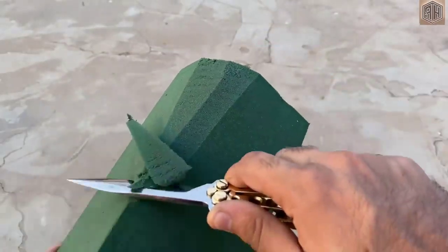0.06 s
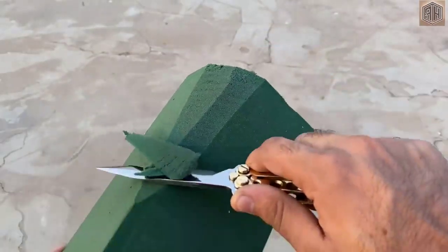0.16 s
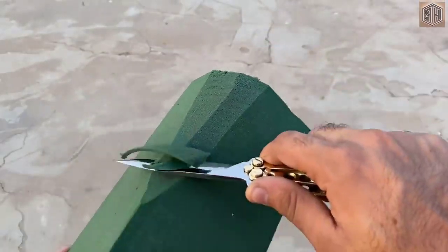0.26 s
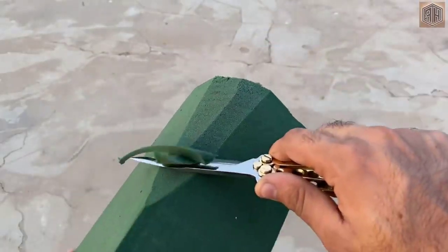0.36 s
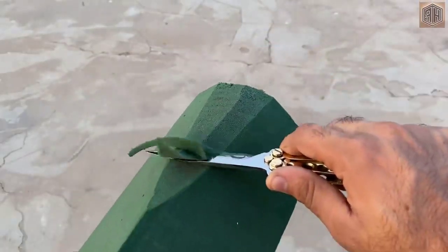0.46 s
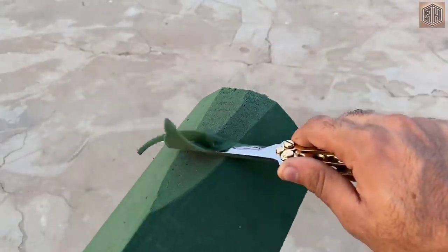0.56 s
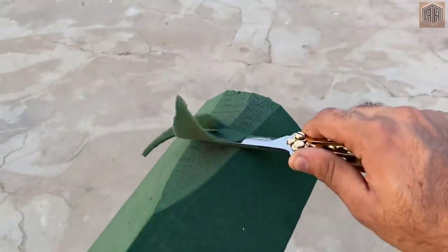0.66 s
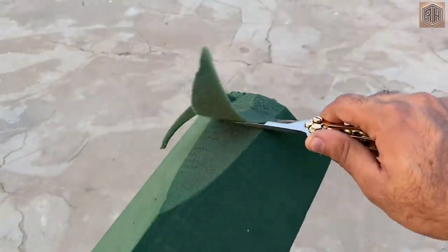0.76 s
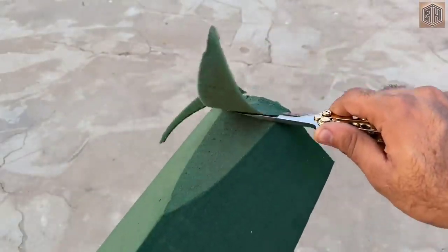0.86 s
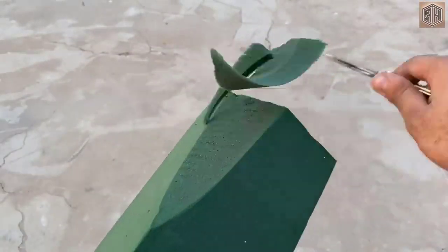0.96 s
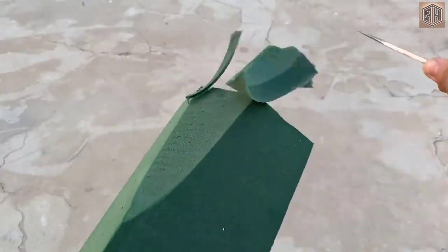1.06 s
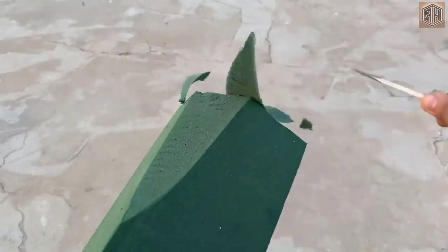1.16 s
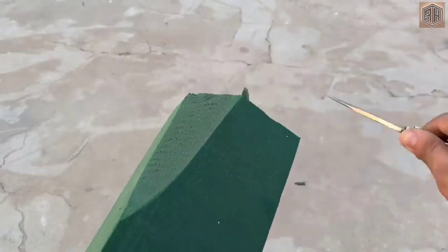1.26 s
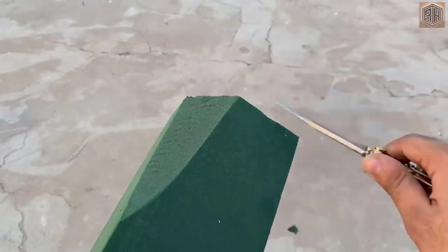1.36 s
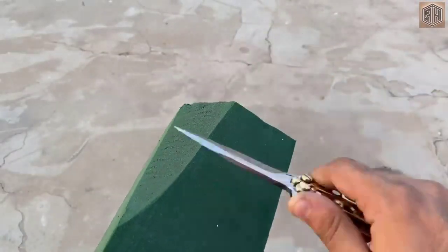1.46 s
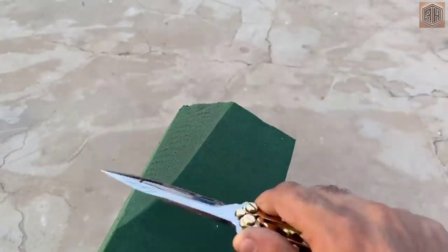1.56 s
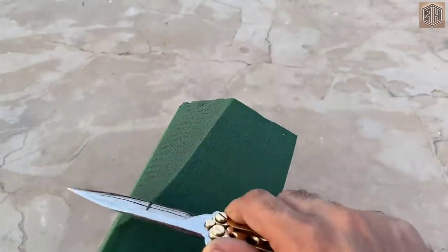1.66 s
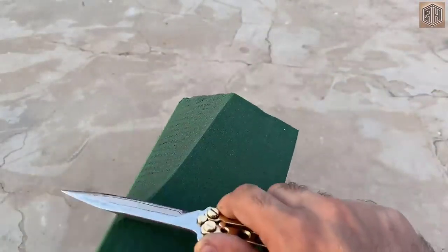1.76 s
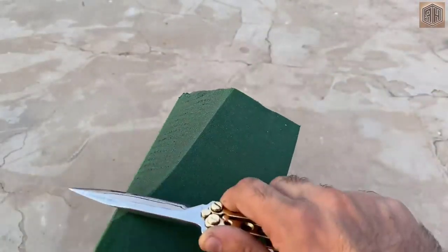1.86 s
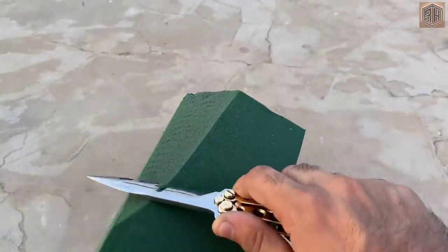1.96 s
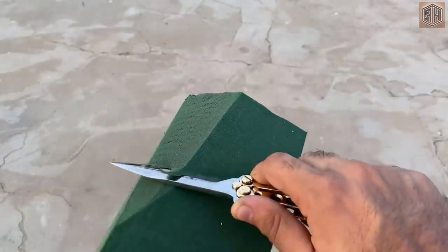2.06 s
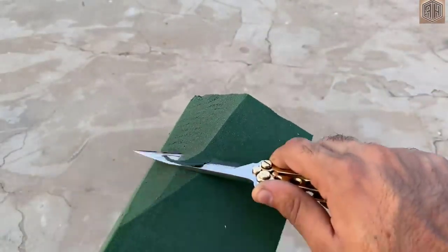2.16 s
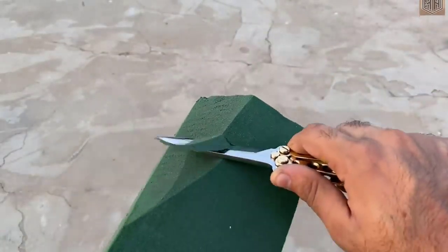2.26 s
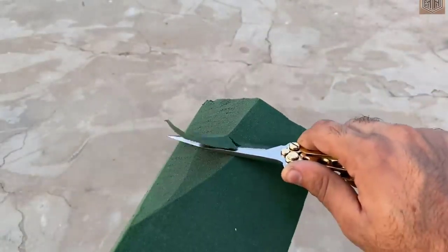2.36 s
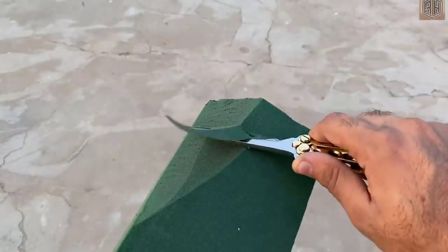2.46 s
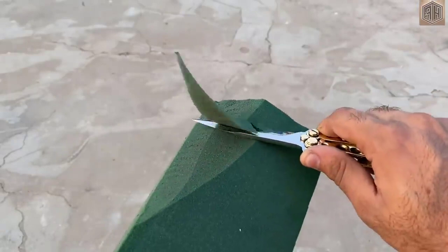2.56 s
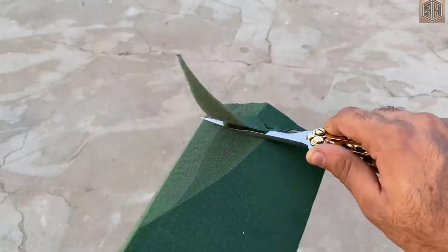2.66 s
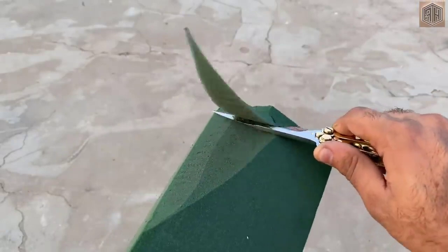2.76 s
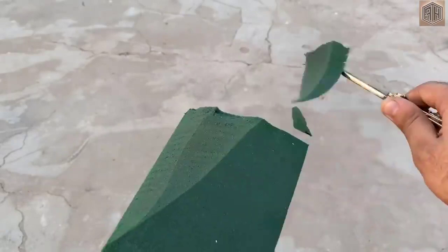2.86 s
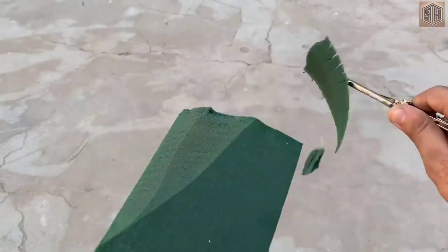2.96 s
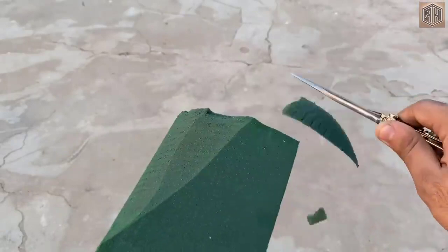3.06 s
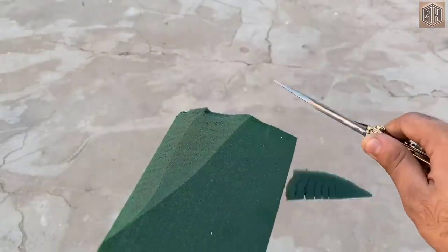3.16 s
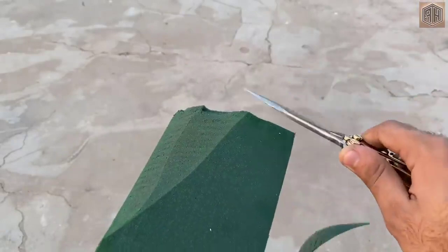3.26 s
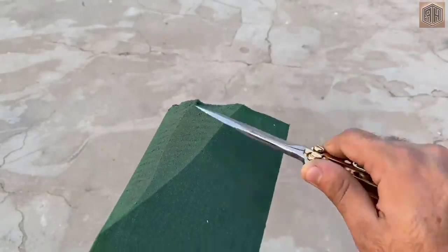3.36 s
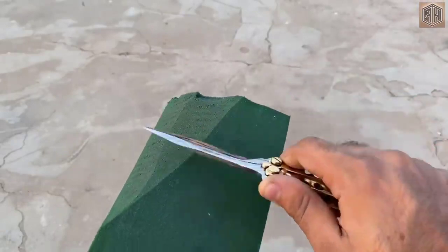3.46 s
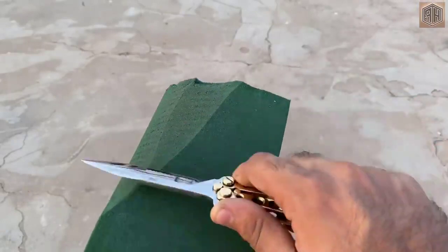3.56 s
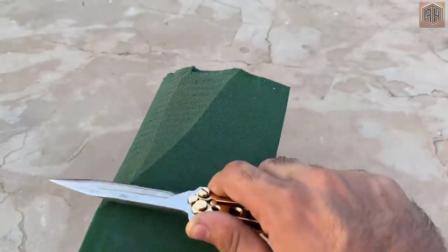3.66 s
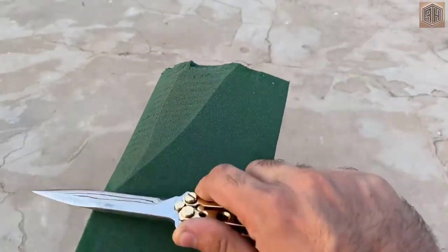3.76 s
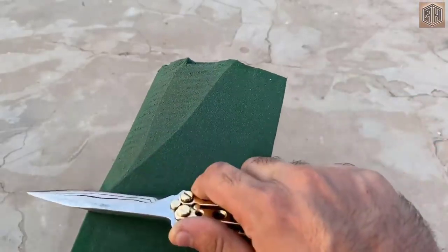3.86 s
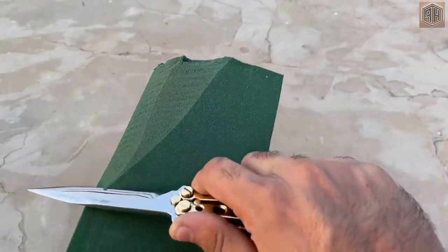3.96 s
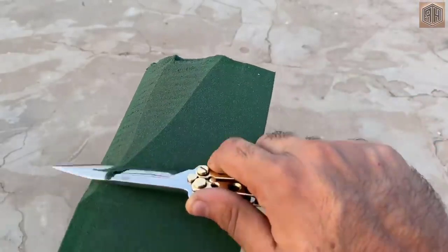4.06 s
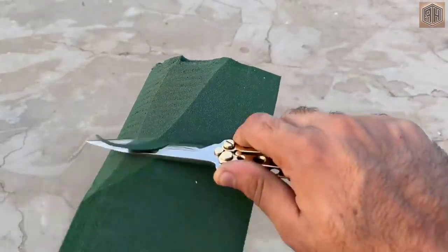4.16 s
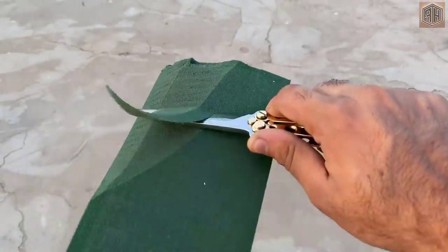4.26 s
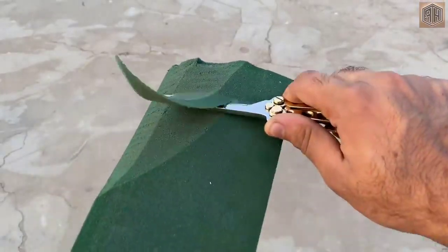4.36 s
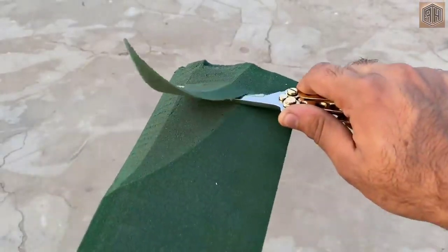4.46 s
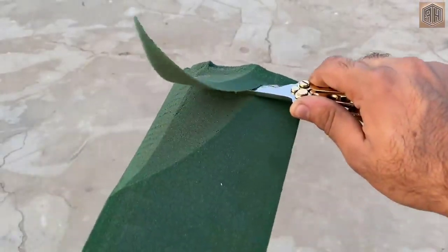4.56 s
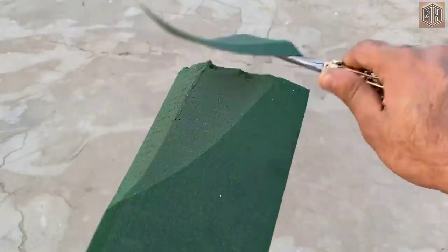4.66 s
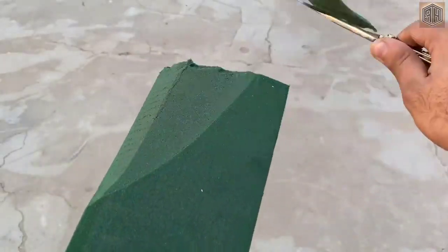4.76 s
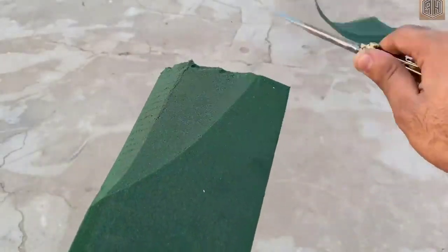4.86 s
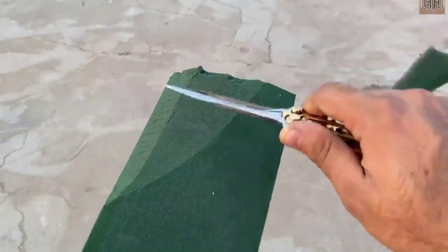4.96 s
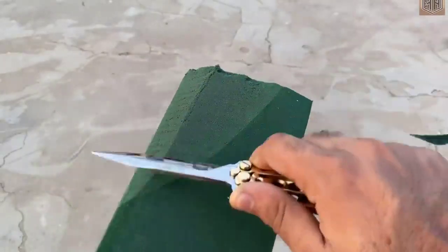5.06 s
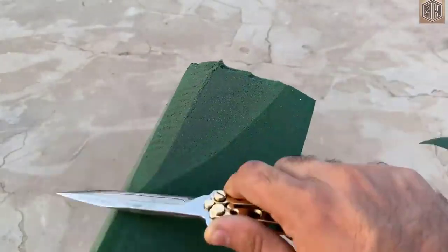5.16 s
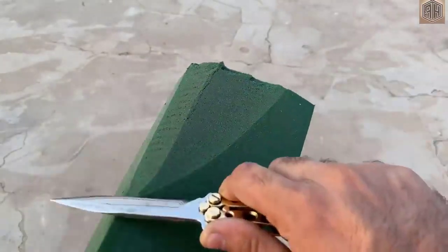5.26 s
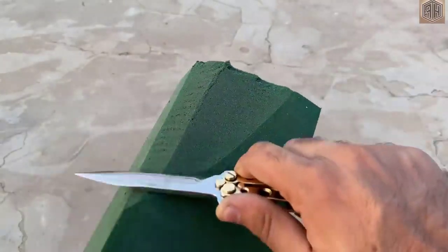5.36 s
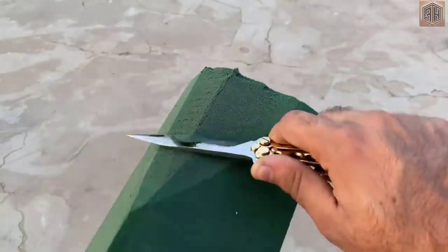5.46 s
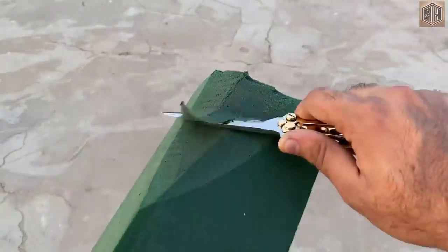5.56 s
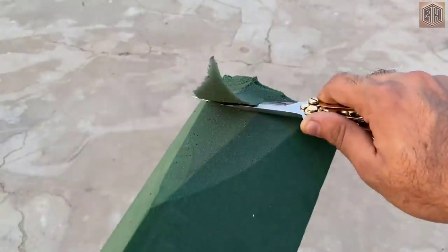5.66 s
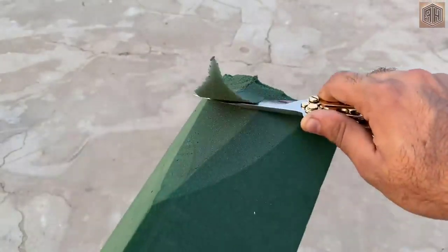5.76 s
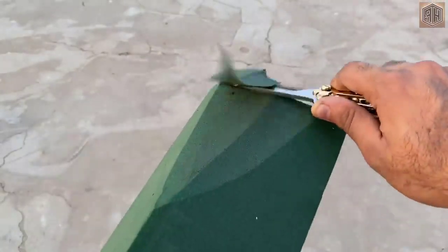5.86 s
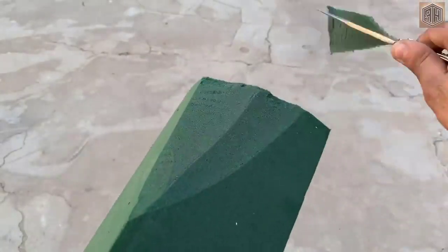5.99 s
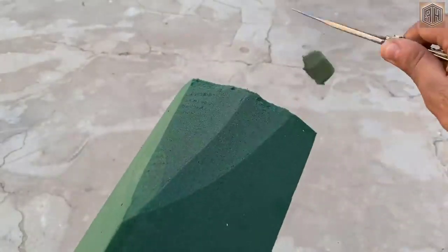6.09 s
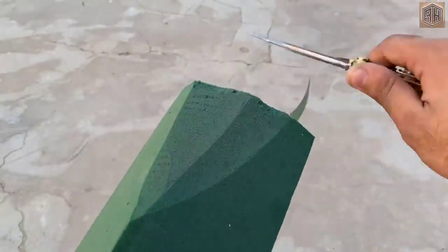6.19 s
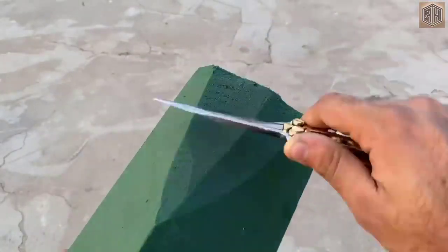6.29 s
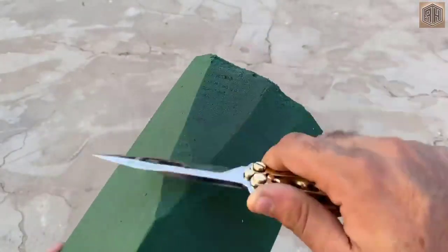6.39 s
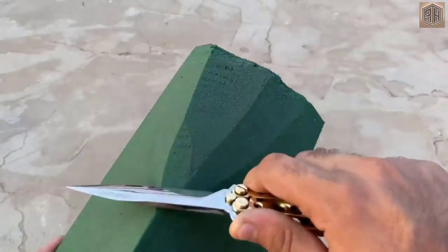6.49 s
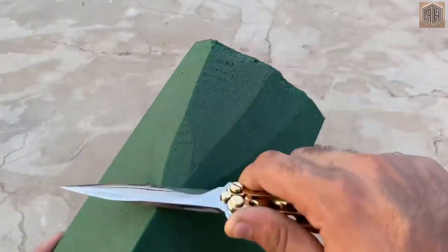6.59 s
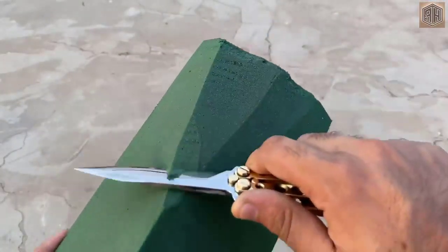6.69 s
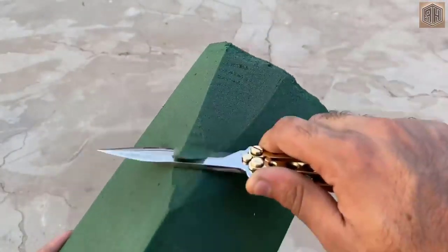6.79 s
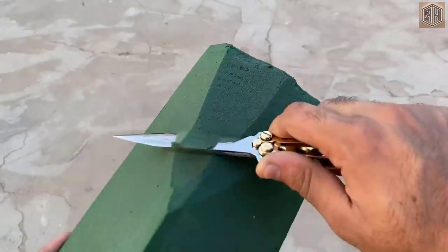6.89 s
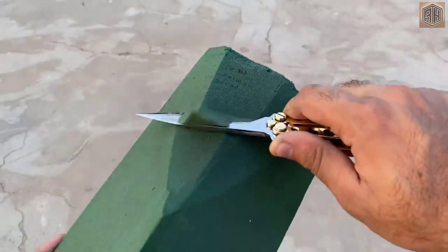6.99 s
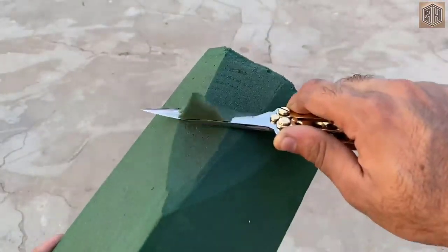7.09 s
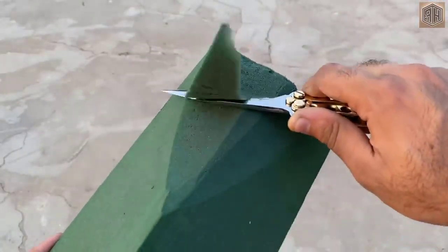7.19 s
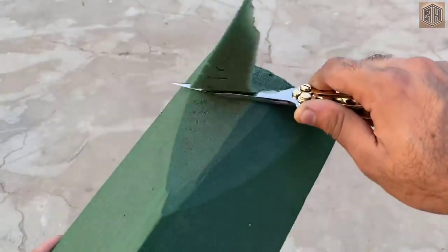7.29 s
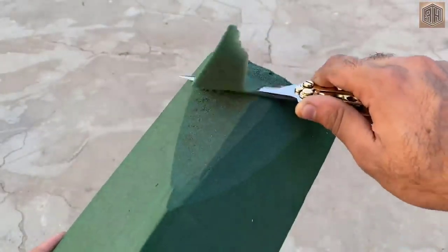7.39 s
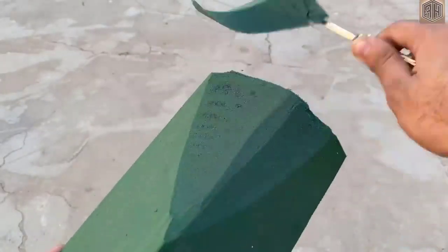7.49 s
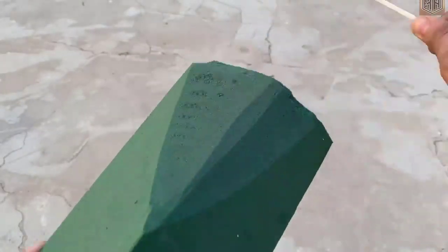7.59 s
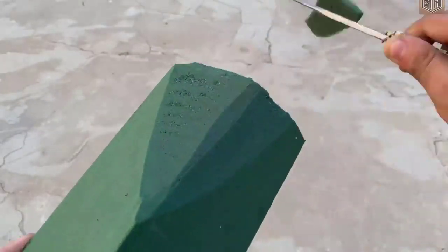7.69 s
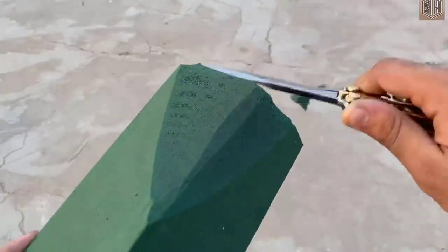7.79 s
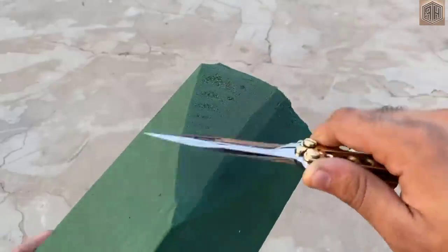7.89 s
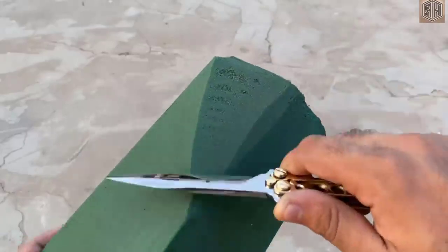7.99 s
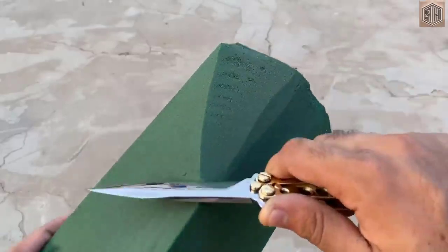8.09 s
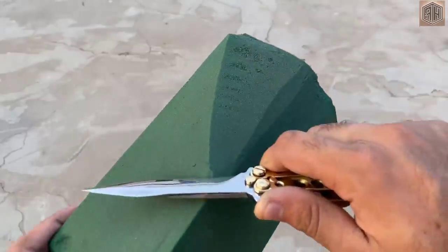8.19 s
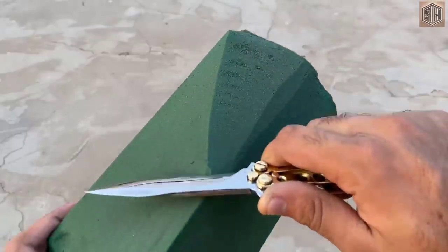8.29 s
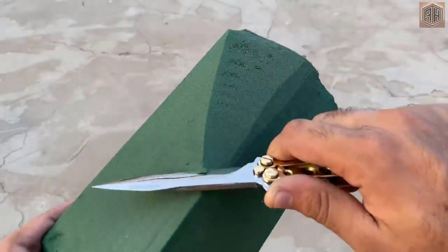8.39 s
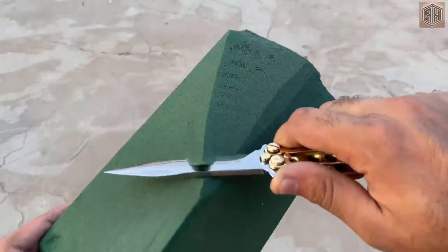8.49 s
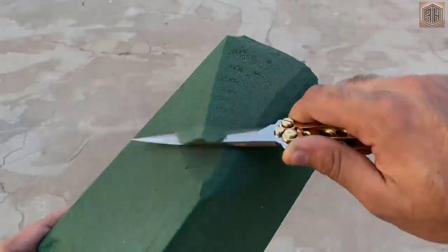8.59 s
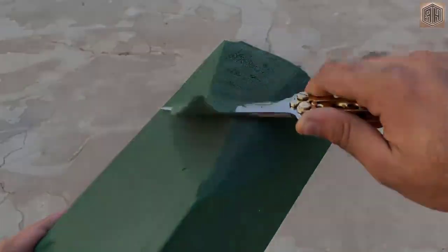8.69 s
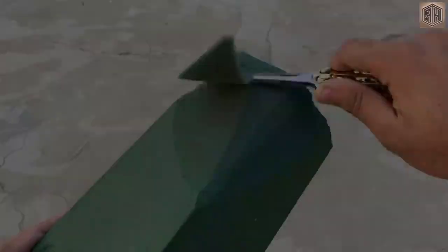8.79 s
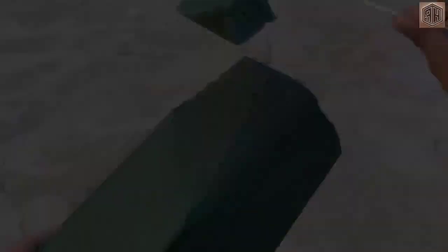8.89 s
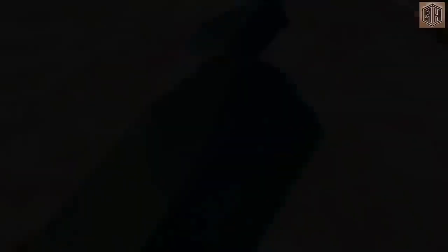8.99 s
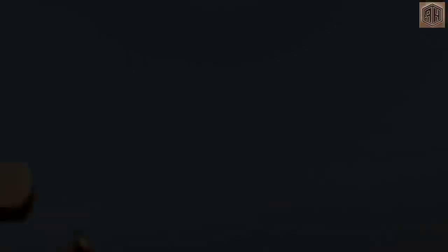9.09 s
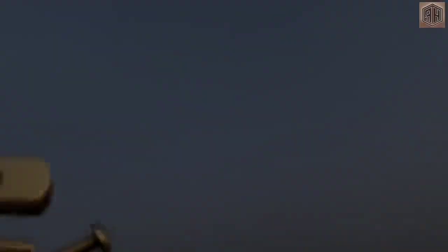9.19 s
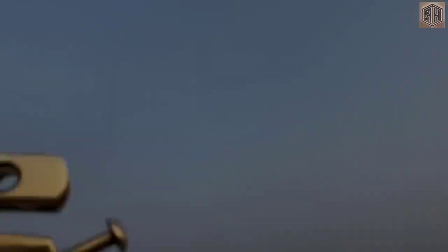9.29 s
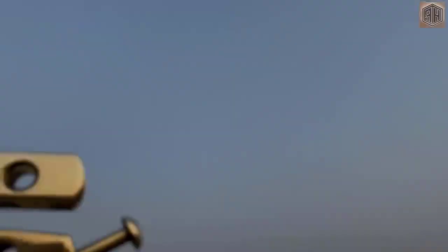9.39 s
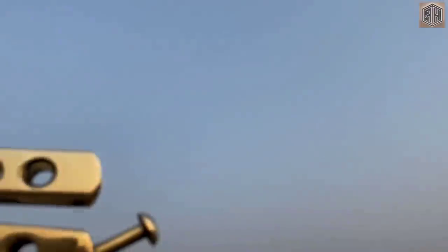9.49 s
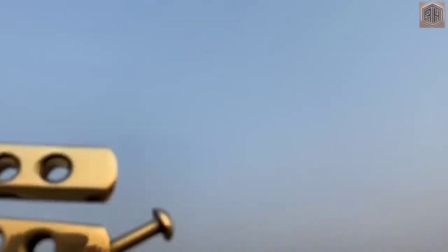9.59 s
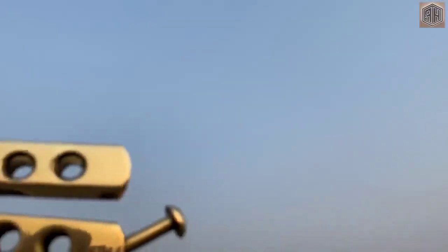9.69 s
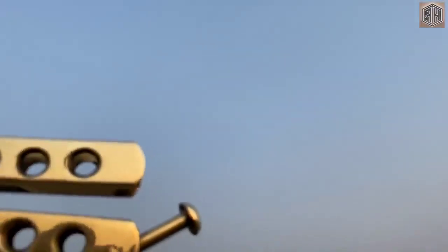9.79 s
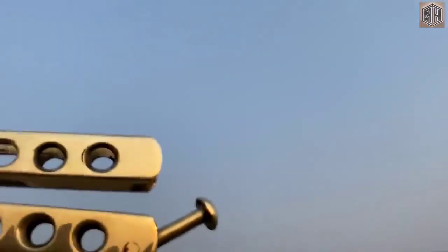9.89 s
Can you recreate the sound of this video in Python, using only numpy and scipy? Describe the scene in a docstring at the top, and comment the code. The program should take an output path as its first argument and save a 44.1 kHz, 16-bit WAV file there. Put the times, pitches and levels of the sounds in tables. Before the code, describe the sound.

Close stereo microphone, slightly stronger on the left, almost no reverberation. Six scratchy, crunchy knife strokes through crisp foam, each under or about a second, with gaps of roughly one second or less. The crackle swells, catches, surges and cuts off as the slice tears loose and the block gives a small dull jolt. Light ticks and grazes fill the gaps over faint outdoor rumble, ending in a muffled rustle and quiet air.

```python
"""A knife shaves six slices off a block of brittle floral foam, close by in a paved yard.
Each cut is filtered noise, a dense crackle of breaking cells: it starts dull and ringing, brightens,
sinks as the blade sticks and surges as it slips. Damped sine modes jolt the block as a slice comes free.
Around the cuts, grainy noise swells scuff the foam and short ringing bursts tick as crumbs snap off.
Behind lie a low noise rumble, thin hiss, faint far-off whines and a soft late rustle."""
import sys
import numpy as np
from scipy import signal
from scipy.fft import rfft, irfft, next_fast_len
from scipy.io import wavfile
from scipy.ndimage import uniform_filter1d

SR = 44100
rng = np.random.default_rng(int(sys.argv[2]) if len(sys.argv) > 2 else 0)


def wav_out(sig):
    """Save sig, one row per channel (or a flat mono array), as 16-bit PCM at SR to the path in sys.argv[1]."""
    wavfile.write(sys.argv[1], SR, np.round(np.clip(np.atleast_2d(sig).T, -1, 1) * 32767).astype(np.int16))


N = 438354
TIME, HZ = np.arange(N) / SR, np.fft.rfftfreq(512, 1 / SR)  # seconds; bins of the short-time spectra

# The slices. Each row: start in seconds, length in seconds, rise in seconds, bite in dB, growth over the
# cut in dB, block body at first in dB, block body at last in dB, fizz in dB, lean to the left on entry
# in dB, low ring of the fresh slice in Hz, high ring in Hz, ring as it tears free in Hz.
CUTS = [(-0.018, 1.049, 0.049, -41.5, 5.5, 0, 2.5, 0.5, 2.5, 3460, 6070, 1905),
        (1.937, 0.96, 0.059, -37.5, -3, -4, 3, 0, 5.5, 1550, 3660, 1800),
        (3.99, 0.76, 0.11, -32, -1, -3, 5.5, 3.5, 11.5, 1616, 3300, 1368),
        (5.397, 0.5965, 0.08, -28, -7, -0.5, 1.5, 4.5, 1.5, 1527, 5220, 1546),
        (6.708, .85, 0.05, -34, -4, 3, -1.5, 4, 0.5, 1110, 2450, 2850),
        (8.398, 0.53, 0.098, -38.5, 14, 2.5, -3.5, 3.5, 0, 2130, 3320, 1219)]
# The blade slips forward. Each row: centre in seconds, level in dB, half length in seconds.
SLIPS = [(0.406, -32.5, 0.0058), (0.555, -32, 0.014), (0.594, -28.5, 0.0048), (0.638, -31.5, 0.0092),
         (0.688, -33.5, 0.0092), (0.729, -33.5, 0.012), (0.792, -32, 0.0089), (0.864, -30, 0.0044),
         (0.89, -32, 0.0068), (0.971, -30, 0.0053), (1.012, -27.5, 0.0063), (2.345, -36.5, 0.043),
         (2.398, -29.5, 0.0046), (2.572, -36, 0.011), (2.626, -29.5, 0.0074), (2.717, -36.5, 0.017),
         (2.841, -28, 0.0096), (2.878, -26, 0.0073), (4.332, -32, 0.0048), (4.739, -25, 0.0062),
         (5.957, -29, 0.0093), (5.982, -24.5, 0.006), (7.026, -29, 0.0072), (7.07, -31, 0.0066),
         (7.127, -30, 0.0047), (7.243, -29, 0.011), (7.285, -26, 0.0094), (7.377, -26.5, 0.0087),
         (7.53, -22, 0.011), (7.556, -26, 0.0069), (8.901, -27.5, 0.0077), (8.924, -25, 0.0053)]
# The blade sticks in the foam. Each row: centre in seconds, drop in dB, half length in seconds.
STALLS = [(0.453, 8.5, 0.028), (.76, 5.5, 0.024), (2.454, 8.5, 0.054), (2.67, 4.5, 0.036),
          (2.777, 11, 0.039), (4.586, 3.5, 0.076), (5.865, 30.5, 0.058), (7.194, 9.5, 0.043),
          (7.457, 17.5, 0.032)]
# What every fresh slice rings with. Each row: pitch in Hz, relative lift in dB.
SLICE_RINGS = [(1160, 8.5), (1580, 2.5), (2080, 2), (3480, 5), (4850, 4.5), (5400, 8)]
# Colour of the breaking cells. Each row: frequency in Hz, relative level in dB per Hz.
CRUNCH_COLOUR = [(300, -8.5), (600, -7), (850, -7), (1050, -9.5), (1400, -2.35), (2200, 1.5), (2700, -1.86),
                 (3400, 0.07), (4600, -2.5), (7500, -4.5), (9000, -2), (10800, -6), (12500, -8.5),
                 (15000, -9.5)]
# Bass trim on that colour. Each row: frequency in Hz, gain in dB.
CRUNCH_BASS = [(20, -32), (90, -15), (180, -3.5), (300, 4)]
# Reach of the body control. Each row: frequency in Hz, share of the control from 0 to 1.
BODY_SHARE = [(900, 0.76), (1300, 0.013)]
# Reach of the fizz control. Each row: frequency in Hz, share of the control from 0 to 1.
FIZZ_SHARE = [(3000, 0.089), (5000, 0.51), (8000, 0.96), (15000, 0.32)]
# How alike the two microphone ports hear. Each row: frequency in Hz, left-right coherence from 0 to 1.
PORT_LIKENESS = [(100, 0.92), (800, 0.93), (1400, .72), (2100, 0.58), (3200, 0.57), (5500, 0.75),
                 (7200, .85), (15000, 0.91)]
# Phase between the ports. Each row: frequency in Hz, lead of the left in radians.
PORT_PHASE = [(200, -0.021), (1400, 0.87), (1800, -1), (2500, -0.64), (3100, 1.3), (3900, 0.83),
              (5500, -0.88), (7000, -0.17)]
# Balance of the ports. Each row: frequency in Hz, left minus right in dB.
PORT_BALANCE = [(150, 1), (600, 2.5), (1600, 3), (4500, 3.5), (7000, 1.5), (9000, 0)]
# Colour of the outdoor rumble and hiss. Each row: frequency in Hz, relative level in dB per Hz.
OUTDOOR_COLOUR = [(15, -48), (25, -26.5), (49, -8), (88, -1), (139, 1.5), (196, -5.5), (335, -13.5),
                  (515, -27), (790, -34.5), (856, -33), (1310, -47), (1630, -46), (2560, -52), (2930, -50),
                  (15000, -74)]
# Level of the outdoor rumble. Each row: time in seconds, level in dB.
RUMBLE_LEVEL = [(0, -53), (1.2, -52), (1.8, -58), (2.75, -45), (2.97, -57.5), (3.3, -50), (3.85, -53),
                (4.5, -48.5), (5.15, -51), (5.8, -48), (6.4, -50), (6.7, -57), (7.6, -53.5), (8.25, -58),
                (8.9, -51), (9.05, -66.5), (9.94, -66.5)]
# The hiss of the open air. Each row: time in seconds, level in dB, treble lift in dB.
AIR = [(0, -68, 0), (1.75, -71.5, 1.5), (5.1, -66, -4.5), (6.15, -66.5, -3), (6.501, -61.5, -5.5),
       (7.75, -72.5, 8), (7.95, -62.5, 10), (8.3, -69, 5.5), (9.301, -72.5, 7.5), (9.94, -75.5, 8.5)]
# Single echoes off the hand and the paving. Each row: delay in seconds, gain.
PAVING = [(.0031, .12), (.0064, .13), (.0089, .08)]
# Decay of the yard's reflections. Each row: frequency in Hz, time to fall 60 dB in seconds.
YARD_DECAY = [(200, 0.067), (2000, 0.11), (6000, 0.048), (14000, 0.15)]
# The block jolts as the blade leaves it. Each row: start in seconds, level in dB.
JOLTS = [(1.021, -41), (2.889, -28), (4.751, -33), (5.995, -29.5), (7.559, -30), (8.937, -49.5)]
# What the block rings with. Each row: pitch in Hz, relative level in dB, time to fall 60 dB in seconds.
BLOCK_MODES = [(67.4, -7.5, 0.26), (125, -3, 0.054), (179, -2, .08), (242, 0, 0.039), (344, -8.5, 0.032)]
# Crumbs snap off and tick. Each row: start in seconds, relative level in dB, centre in Hz, decay in seconds.
TICKS = [(1.132, -51.5, 6280, 0.0032), (1.256, -73, 4500, 0.0043), (1.311, -69, 8000, 0.0081),
         (1.345, -72, 6800, .01), (1.971, -55, 5000, 0.0044), (2.467, -27, 6280, 0.0034),
         (3.351, -66, 7140, 0.0033), (3.77, -51, 5570, .005), (3.812, -52, 5060, .005),
         (5.22, -71, 6250, .005), (5.292, -52.5, 4650, 0.0027), (5.415, -57, 4900, 0.0028),
         (6.132, -66, 1886, 0.0038), (6.606, -53, 5500, 0.0034), (7.42, -39.5, 5000, .004),
         (7.448, -48.5, 7000, 0.0033), (7.476, -35, 6100, .004), (8.155, -43.5, 5820, 0.0036),
         (8.217, -50.5, 1080, 0.0043), (8.295, -59, 4540, 0.0097), (9.721, -60, 598, 0.013)]
# Faint far-off whines and chirps. Each row: centre in seconds, level in dB, half length in seconds,
# pitch in Hz, width in Hz.
FAR_TONES = [(3.068, -80.5, 0.025, 2940, 39.7), (3.385, -79, 0.02, 4230, 150), (3.42, -81, 0.053, 1650, 80),
             (6.313, -70, 0.043, 797, 90), (6.53, -84, 0.024, 2900, 29.3), (6.726, -65, 0.034, 1037, 60),
             (9.095, -62, 0.025, 947, 150)]
# The blade brushes the foam as it is set down. Each row: centre in seconds, relative level in dB,
# half length in seconds, ring in Hz, how fully the face rings from 0 to 1.
SCUFFS = [(3.779, -49, 0.0094, 1690, 1), (3.827, -50, 0.014, 1700, 1), (3.864, -52, .018, 1670, 0.93),
          (6.609, -58, 0.012, 2400, .4), (7.905, -62, 0.0094, 1690, .4), (7.984, -61.5, 0.027, 2130, 0.4),
          (8.009, -38, 0.0072, 2800, 0.1), (8.029, -52, 0.019, 2130, 0.4), (8.17, -61.5, 0.043, 2220, 0.6),
          (8.304, -60, 0.012, 3170, 0.96), (8.41, -66, .031, 2130, .5)]
# Colour of the scuffs. Each row: frequency in Hz, relative level in dB per Hz.
SCUFF_COLOUR = [(100, -9), (1100, -18), (1600, -3), (2400, 1), (3600, -3.5), (5000, -5), (6300, -5.5),
                (8400, -7.5), (10500, -9), (15500, -18)]
# What the face of the block rings with under a scuff. Each row: pitch in Hz, lift in dB.
FACE_RINGS = [(3350, 3), (4400, 13), (4700, 10), (5050, 15), (5450, 14)]
# Everything drops out briefly. The pair: start in seconds, end in seconds.
HUSH = (9.125, 9.187)
# A soft dull rustle. Each row: centre in seconds, level in dB, half length in seconds.
RUSTLES = [(9.338, -58, .03), (9.402, -62.5, .035)]
# Colour of the rustle. Each row: frequency in Hz, relative level in dB per Hz.
RUSTLE_COLOUR = [(150, -22.5), (350, 3), (700, 3), (1300, -10), (2200, -7.5), (2600, -10), (3200, -6),
                 (4000, -32), (8000, -57)]

# The edge sinks in from this far down, and leaves the foam abruptly.
ENTRY_DB, ENTRY_CURVE, RELEASE_DB_PER_S = 42.5, 1.51, 854
TOUCH_S = 0.012  # the edge first meets the foam this gently
FRESH_S, TEAR_S = 0.27, 0.2  # how long a slice stays short and stiff; how long it takes to tear free
# Duller on entry and on tearing, hissier while the blade sticks.
FRESH_FIZZ_DB, STALL_FIZZ_DB, TEAR_FIZZ_DB = -9.5, 3, -1.5
LEAVE_FIZZ_DB, LEAVE_S = -8.5, 0.02  # the fizz stops first as the edge comes out
# The lighter the bite, the more of the block's body is heard.
USUAL_BITE_DB, BITE_RANGE_DB, LIGHT_BODY_DB = -34.5, 7.5, 4.5
JUDDER_PER_S, JUDDER_DB, JUDDER_DRIFT = 31, 0.5, 0.16  # the edge chatters as it advances
LOW_RING_DB, HIGH_RING_DB, TEAR_RING_DB, RING_FADE_S = 8.5, 9.5, 8, 0.33
SNAPS_PER_S, SNAP_DB, SNAP_S = 45, -0.5, 0.0005  # larger cells burst now and then on top of the crackle
PORT_SPLIT_HZ, PORT_LAG_S = 7100, 0.000272  # above the split the left port lags more and more in phase
EDGE_HZ = 15720  # the whole sound is cut off above this frequency


def amp(db):
    """Decibels to linear gain."""
    return 10 ** (np.asarray(db) / 20)


def evened(x):
    """Scale to unit RMS."""
    return x / np.sqrt(np.mean(x ** 2) + 1e-20)


def read(points, hz=HZ):
    """A table of values over frequency, joined on a log axis."""
    f, value = np.transpose(points)
    return np.interp(np.log(hz + 1), np.log(f + 1), value)


def spectra(x, size=512):
    """Short-time spectra as (.., frames, bins)."""
    z = signal.stft(x, nperseg=size, noverlap=size * 3 // 4)[2]
    return np.swapaxes(z, -1, -2)


def sound(z, size=512):
    """Short-time spectra back to samples."""
    x = signal.istft(np.swapaxes(z, -1, -2), nperseg=size, noverlap=size * 3 // 4)[1]
    return x[..., :N]


def frame_times(z):
    """Time in seconds of each frame over the whole scene."""
    return np.linspace(0, N / SR, z.shape[1])


def wander(rate_hz):
    """Smooth random drift of unit RMS, moving mostly below the given rate."""
    size = next_fast_len(N, True)
    softening = 1 + (np.fft.rfftfreq(size, 1 / SR) / rate_hz) ** 2
    return evened(irfft(rfft(rng.standard_normal(size)) / softening, size)[:N])


def bell(x, centre, half):
    """A smooth bump of height one."""
    return np.exp(-((x - centre) / half) ** 2)


def ringing(modes, width_hz):
    """Lift in dB over frequency from narrow resonances."""
    return sum(db * bell(HZ, hz, width_hz) for hz, db in modes)


def patches(shape, size):
    """Narrow random peaks and valleys of unit depth that last some frames."""
    lasting = uniform_filter1d(rng.standard_normal(shape), size, axis=0)
    return evened(uniform_filter1d(lasting, size // 2, axis=0))


def swells(rows, attack=0.95):
    """Summed power of short pointed swells; an attack under 1 makes them rise faster than they fall."""
    power = np.zeros(N)
    for s, db, half in rows:
        near = slice(max(0, int((s - 10 * half) * SR)), int((s + 10 * half) * SR))
        t = (TIME[near] - s) / half
        power[near] += amp(db) ** 2 * np.exp(-np.maximum(-t / attack, t) ** 1.5)
    return power


def cells(grain_db, flutter_db, flutter_hz):
    """Two draws of breaking cells: each has its own size, and whole rows of them give way together."""
    size = amp(grain_db * wander(4200) + flutter_db * wander(flutter_hz))
    return evened(size * rng.standard_normal((2, N)))


def ports(pair, colour_db):
    """Spectra at two microphone ports: partly alike, louder on the left, the high treble later there."""
    a, b = spectra(pair)
    same = np.clip(read(PORT_LIKENESS), 0, 1)
    phase = read(PORT_PHASE) - 2 * np.pi * PORT_LAG_S * np.maximum(HZ - PORT_SPLIT_HZ, 0)
    lean = amp(read(PORT_BALANCE) / 2)
    left = a * lean * np.exp(1j * phase)
    right = (same * a + np.sqrt(1 - same ** 2) * b) / lean
    return np.array([left, right]) * amp(colour_db)


def stroke(t):
    """At each moment: age of the cut, its length, its bite in dB, how far the blade is stuck, its colours."""
    rows = np.array(CUTS)
    current = np.maximum(np.searchsorted(rows[:, 0], t) - 1, 0)
    start, length, rise, bite, growth, *colours = rows[current].T
    age = np.maximum(t - start, 0)
    stuck_db = sum(db * bell(t, s, half) for s, db, half in STALLS)
    entry_db = ENTRY_DB * np.exp(-(age / rise) ** ENTRY_CURVE)
    entry_db -= 20 * np.log10(np.tanh(age / TOUCH_S) + 1e-6)
    release_db = RELEASE_DB_PER_S * np.clip(age - length, 0, 0.5)
    bite_db = bite + growth * np.minimum(age / length, 1) - entry_db - stuck_db - release_db
    return np.array([age, length, bite_db, np.tanh(stuck_db / 10), *colours])


def snaps():
    """Gain on the crackle: one, with a brief spike wherever a large cell bursts."""
    bursts = rng.exponential(1, N).clip(0, 2) * (rng.random(N) < SNAPS_PER_S / SR)
    return 1 + amp(SNAP_DB) * signal.lfilter([1], [1, -np.exp(-1 / (SNAP_S * SR))], bursts)


def cutting_force():
    """Loudness of the cut: the chattering bite with its snaps, plus the surges as the blade slips."""
    judder_rate = JUDDER_PER_S * (1 + JUDDER_DRIFT * wander(8.9))
    judder_db = JUDDER_DB * np.sin(2 * np.pi * np.cumsum(judder_rate) / SR)
    bite = amp(stroke(TIME)[2] + judder_db) * snaps()
    return np.sqrt(bite ** 2 + swells(SLIPS, attack=1.0))


def cutting(lean_db=-1.06, ring_width_hz=120):
    """Cells break along the edge; the block and the curling slice colour the crackle."""
    force = cutting_force()
    z = ports(cells(grain_db=2.0, flutter_db=1.0, flutter_hz=127), read(CRUNCH_COLOUR) + read(CRUNCH_BASS))
    now = stroke(frame_times(z))[..., None]
    age, length, bite_db, stuck, first_body, last_body, fizz, lean, low_hz, high_hz, tear_hz = now
    fresh = np.exp(-age / FRESH_S)
    tearing = bell(age, length, TEAR_S)
    leaving = np.clip((age - length) / LEAVE_S, 0, 1)

    body = first_body + (last_body - first_body) * np.minimum(age / length, 1)
    body += LIGHT_BODY_DB * np.tanh((USUAL_BITE_DB - bite_db) / BITE_RANGE_DB)
    fizz = fizz + FRESH_FIZZ_DB * fresh + STALL_FIZZ_DB * stuck
    fizz += TEAR_FIZZ_DB * tearing + LEAVE_FIZZ_DB * leaving
    slice_modes = SLICE_RINGS + [(low_hz, LOW_RING_DB), (high_hz, HIGH_RING_DB)]
    rings = bell(age, 0, RING_FADE_S) * ringing(slice_modes, ring_width_hz)
    rings += tearing * ringing([(tear_hz, TEAR_RING_DB)], ring_width_hz)
    # many weaker resonances drift, deepest while the slice is still short and stiff
    depth_db = 2.2 + 1.4 * fresh
    drifting = evened(uniform_filter1d(patches(z.shape[1:], size=56), size=2, axis=1))

    high = read(FIZZ_SHARE)
    gain = amp(body * read(BODY_SHARE) + fizz * high + rings + depth_db * drifting)
    # hold the core band steady, so colour changes leave the loudness to the force
    core = (HZ > 1100) & (HZ < 6000)
    gain /= np.sqrt(np.mean(gain[:, core] ** 2, axis=1, keepdims=True))
    side = amp((lean_db + lean * fresh) * np.clip(1 - high, 0, 1) / 2)
    crackle = sound(z * gain * np.array([side, 1 / side])) / np.std(sound(z * core))
    return force * crackle


def outdoors(split_hz=390, lumpy_db=3.0, bass_spread=0.22, air_spread=1.0,
             drone_hz=60, drone_width_hz=8, drone_db=-7.5, patchy_db=6.0):
    """Lumpy rumble with a low drone, nearly mono, under a thin, wide, patchy hiss."""
    hz = np.fft.rfftfreq(N, 1 / SR)
    noise = rfft(rng.standard_normal((2, N)))
    shaped = noise * amp(read(OUTDOOR_COLOUR, hz))
    low = 1 / (1 + (hz / split_hz) ** 8)
    sides = np.array([[1], [-1]])

    s, air_db, treble_db = np.transpose(AIR)
    hiss = spectra(irfft(shaped * (1 - low), N))
    treble_now = np.interp(frame_times(hiss), s, treble_db)[:, None]
    bright_db = treble_now * HZ ** 2 / (HZ ** 2 + 2500 ** 2)
    hiss = sound(hiss * amp(bright_db + patchy_db * patches(hiss.shape[1:], size=40)))
    hiss = hiss[0] + air_spread * sides * hiss[1]

    # the rumble surges unevenly from one pitch to the next
    lumps = spectra(evened(irfft(shaped * low, N)), size=4096)
    bass = evened(sound(lumps * amp(3 * patches(lumps.shape[1:], size=8)), size=4096))
    drone = evened(irfft(noise[0] / (1 + ((hz - drone_hz) / drone_width_hz) ** 4), N))
    bass = bass[0] + amp(drone_db) * drone + bass_spread * sides * bass[1]
    bass = bass * amp(lumpy_db * wander(6))

    rumble_gain = amp(np.interp(TIME, *np.transpose(RUMBLE_LEVEL)))
    return evened(bass) * rumble_gain + evened(hiss) * amp(np.interp(TIME, s, air_db))


def paving(x):
    """The hand and the paving throw back single echoes that ripple the spectrum."""
    echoes = sum(gain * np.pad(x, ((0, 0), (round(delay * SR), 0)))[:, :N] for delay, gain in PAVING)
    return x + echoes


def yard(x, gap_s=0.0039):
    """A short spray of reflections from the paving and walls, each band dying at its own rate."""
    t = np.arange(SR // 2) / SR
    sparse = rng.standard_normal((2, len(t))) * (rng.random((2, len(t))) < 0.1)
    z = spectra(sparse * (t > gap_s))
    age = np.linspace(0, t[-1], z.shape[1])[:, None]
    tail = sound(z * amp(-60 * age / read(YARD_DECAY)))
    tail = tail / np.linalg.norm(tail, axis=1, keepdims=True)
    return signal.fftconvolve(x, tail, axes=1)[:, :N]


def jolts(rise_s=0.002):
    """Freed of the blade, the block springs back in a few damped modes."""
    out, t = np.zeros(N), np.arange(SR // 4) / SR
    for s, level_db in JOLTS:
        ring = sum(amp(db - 60 * t / t60) * np.sin(2 * np.pi * (hz * t + rng.random()))
                   for hz, db, t60 in BLOCK_MODES)
        out[round(s * SR):][:len(t)] += amp(level_db) * ring * (1 - np.exp(-t / rise_s))
    return out


def ticks(level_db=-3.5, ring_db=-2.5, rise_s=0.00053):
    """Each crumb is a short grainy burst that rings briefly at its own pitch."""
    out, t = np.zeros((2, N)), np.arange(SR // 10) / SR
    for s, db, hz, decay in TICKS:
        band = signal.butter(2, [hz / 1.7, min(hz * 1.7, SR / 2 - 500)], "band", fs=SR)
        grain = evened(signal.lfilter(*band, rng.standard_normal((2, len(t)))))
        burst = grain + amp(ring_db) * np.sin(2 * np.pi * hz * t)
        envelope = np.exp(-t / decay) * (1 - np.exp(-t / rise_s))
        out[:, round(s * SR):][:, :len(t)] += amp(db) * burst * envelope
    z = ports(out, level_db)
    return sound(z * amp(3 * patches(z.shape[1:], size=30)))


def far_tones():
    """Faint whines and chirps from far off: sines whose random drift in strength sets their width."""
    out = np.zeros(N)
    for s, db, half, hz, width in FAR_TONES:
        envelope = np.sqrt(2 * swells([(s, db, half)]))
        out += envelope * wander(width) * np.sin(2 * np.pi * hz * TIME)
    return out


def scuffs(level_db=-1.5, ring_db=17, ring_width_hz=160):
    """The flat of the blade grazes a few cells, and the face of the block rings faintly."""
    s, db, half, hz, depth = np.transpose(SCUFFS)
    z = ports(cells(grain_db=3.5, flutter_db=-0.5, flutter_hz=200), read(SCUFF_COLOUR))
    nearest = np.argmin(abs(frame_times(z)[:, None] - s), axis=1)[:, None]
    colour_db = depth[nearest] * ringing(FACE_RINGS + [(hz[nearest], ring_db)], ring_width_hz)
    colour_db += 3.5 * patches(z.shape[1:], size=50)
    graze = sound(z * amp(colour_db)) / np.std(sound(z)) / 2
    return amp(level_db) * np.sqrt(swells(zip(s, db, half), attack=0.74)) * graze


def rustle():
    """A soft, dull, grainy brush of noise."""
    z = spectra(cells(grain_db=2.5, flutter_db=1.0, flutter_hz=90))
    colour_db = read(RUSTLE_COLOUR) + 2.0 * patches(z.shape[1:], size=30)
    return np.sqrt(swells(RUSTLES)) * evened(sound(z * amp(colour_db)))


def scene(yard_db=-18.0):
    """Knife and foam up close, the yard around them."""
    near = cutting() + scuffs() + ticks() + jolts()
    return paving(near) + amp(yard_db) * yard(near) + outdoors() + rustle() + far_tones()


def record(dry, hush_db=-58.0):
    """The brief drop in level, then the band limit."""
    hushed = uniform_filter1d(1.0 * ((TIME > HUSH[0]) & (TIME < HUSH[1])), size=600)
    edge = signal.firwin(1023, EDGE_HZ, window=("kaiser", 9), fs=SR)
    return signal.oaconvolve(dry * amp(hush_db * hushed), edge[None], "same")


dry = scene()
out = record(dry)
wav_out(out)
```